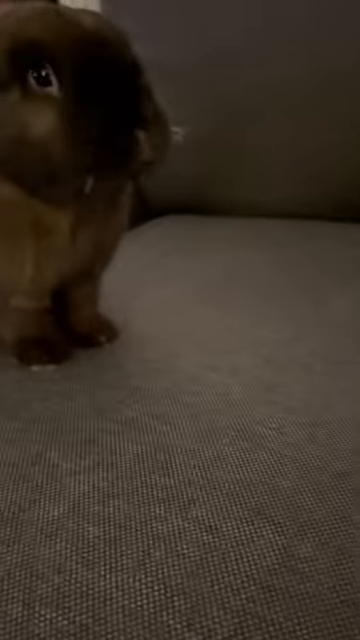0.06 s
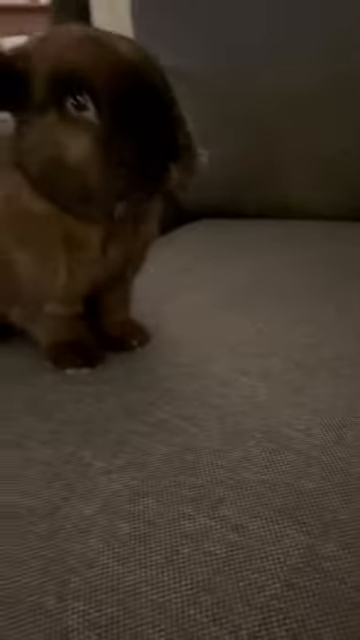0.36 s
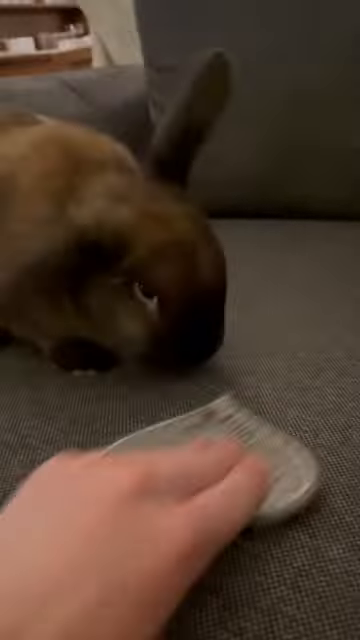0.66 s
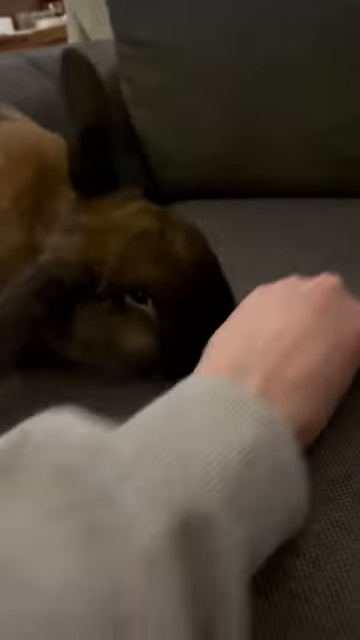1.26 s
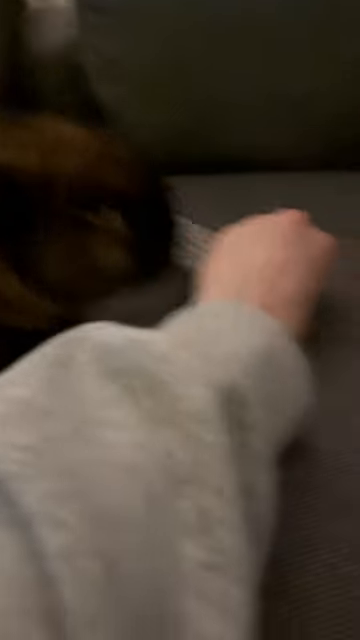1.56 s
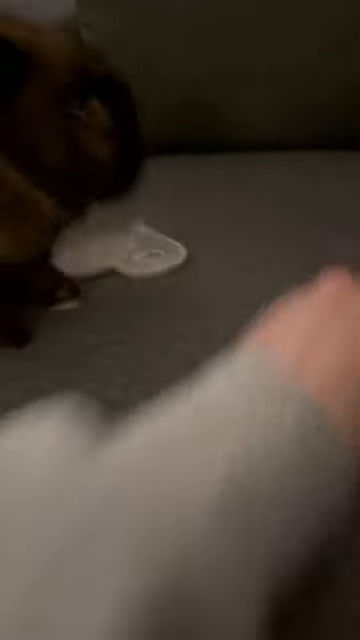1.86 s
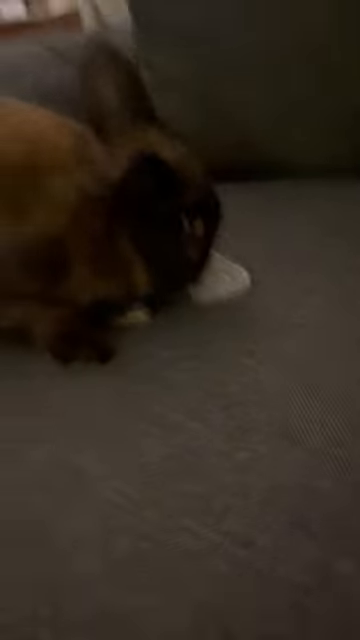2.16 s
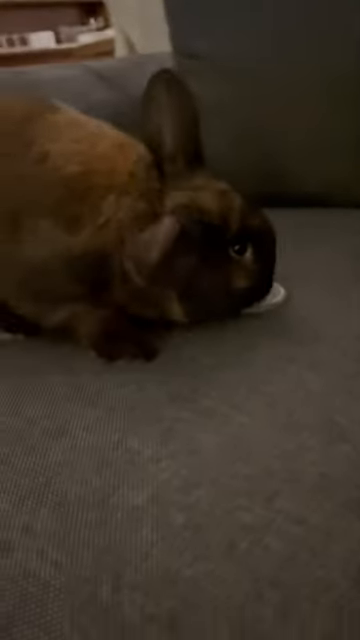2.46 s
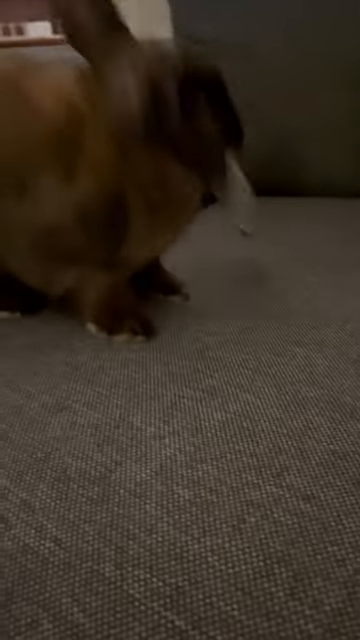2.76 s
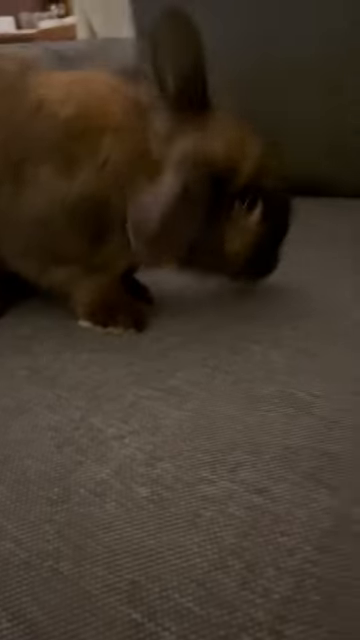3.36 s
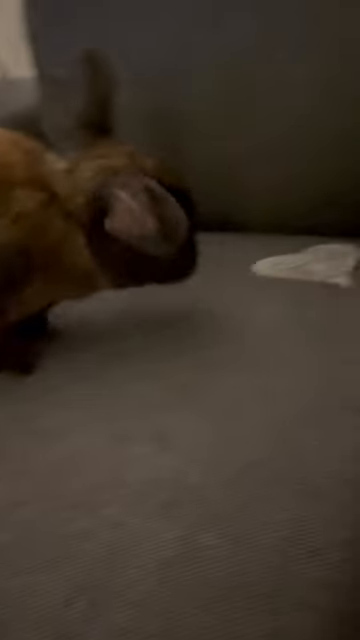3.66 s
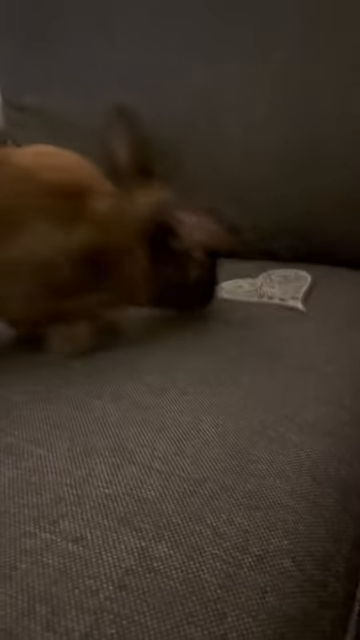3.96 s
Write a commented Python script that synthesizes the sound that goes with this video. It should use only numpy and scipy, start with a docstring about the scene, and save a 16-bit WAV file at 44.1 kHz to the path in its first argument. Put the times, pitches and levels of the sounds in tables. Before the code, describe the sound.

A cloth piece slides over couch fabric, followed by soft thumps and ticks from a rabbit.

```python
"""In a quiet humming room, heard from close by, a hand slaps a flat cloth piece onto a couch (0.5 s) and
slides it towards a rabbit; stick-slip friction over the weave makes it buzz, scrape and hiss.
The cuff rustles by the microphone (from 1.3 s), then the sleeve drags back over the seat (1.6-2.4 s) as
paws thump the cushion (1.8 s). The rabbit picks the piece up with ticks of teeth and claws, tosses it
and drops on its paws (from 3 s), each impact exciting the cover, frame and cushion of the seat."""
import sys
import numpy as np
from scipy import signal
from scipy.fft import rfft, irfft
from scipy.io import wavfile
from scipy.ndimage import uniform_filter1d

SR = 44100
rng = np.random.default_rng(int(sys.argv[2]) if len(sys.argv) > 2 else 0)


def generate_wav(signal):
    """Clip the signal to [-1, 1] and save it as 16-bit WAV at the path in sys.argv[1]."""
    frames = np.transpose(np.atleast_2d(signal))
    scaled = np.clip(frames, -1, 1) * 32767
    pcm = np.round(scaled).astype(np.int16)
    wavfile.write(sys.argv[1], SR, pcm)


N = 176400
T = np.arange(N) / SR
HZ = np.fft.rfftfreq(N, 1 / SR)

# Rubbing sounds at the two microphone ports: frequency_hz, correlation, left_minus_right_db
MIC_PORTS = [(49.7, 0.94, -0.5), (129, 0.85, 0.5), (254, 0.94, 0.5), (615, 0, 2), (1070, 0.095, 2.5),
             (2020, 0.61, 0.5), (3300, 0.27, -0.5), (6100, 0, 1.5), (7140, 1, -5), (9050, 0.68, 1.5),
             (11500, 1, 0)]
# The piece as a compact source a little to the left: frequency_hz, correlation, extra_left_minus_right_db
PIECE_POSITION = [(100, 1, -0.5), (290, 1, 0.5), (640, 0.57, 4), (1300, 0.93, 3), (2400, 0.42, -1.5),
                  (5000, .2, 0.5)]
# Two grades of friction: coarse snags on threads and fine slips of fibres
SNAGS = dict(slips_per_s=2600, spread_db=2.5)
FIBRES = dict(slips_per_s=14000, spread_db=3)


def amp(db):
    """Amplitude ratio of a level in decibels."""
    return 10 ** (np.asarray(db) / 20)


def unit(x):
    """Normalisation to an rms of 1."""
    return x / np.sqrt(np.mean(x ** 2) + 1e-20)


def spectrum(points, column=1):
    """Interpolation of one table column over logarithmic frequency."""
    table = np.array(points, float)
    return np.interp(np.log(HZ + 1), np.log(table[:, 0] + 1), table[:, column])


def envelope(points):
    """Gain interpolated in time from a table's last column (dB); silent outside the table."""
    table = np.array(points)
    sounding = (T > table[0, 0]) & (T < table[-1, 0])
    return amp(np.interp(T, table[:, 0], table[:, -1])) * sounding


def swell(peak_s, rise_s, fall_s, level_db):
    """Peaked envelope, 14 dB down one rise time before the peak and one fall time after."""
    distance = np.where(T < peak_s, (peak_s - T) / rise_s, (T - peak_s) / fall_s)
    return amp(level_db - 14 * np.minimum(distance, 10) ** 1.4)


def colour(x, points):
    """Minimum-phase filtering: folding the cepstrum makes a table of gains a causal response."""
    cepstrum = irfft(np.log(amp(spectrum(points))), N)
    cepstrum[1:N // 2] *= 2
    cepstrum[N // 2 + 1:] = 0
    return irfft(rfft(x) * np.exp(rfft(cepstrum)), N)


def wander(rate_hz):
    """Random modulation: low-passed noise of rms 1."""
    return unit(irfft(rfft(rng.standard_normal(N)) * np.exp(-(HZ / rate_hz) ** 2), N))


def correlate(pair, points):
    """Partial coherence: mid-side mixing makes independent signals alike or opposed at the two ports."""
    first, second = rfft(pair)
    correlation = np.clip(spectrum(points), -1, 1)
    mid = first * np.sqrt((1 + correlation) / 2)
    side = second * np.sqrt((1 - correlation) / 2)
    return irfft(np.array([mid + side, mid - side]), N)


def add(mix, start_s, sound):
    """Superposition of a sound onto the mix."""
    part = mix[round(start_s * SR):][:len(sound)]
    part += sound[:len(part)]


def shifting_folds(pair, depth_db=2.5):
    """Spectral modulation: the colour drifts in random patches as new folds of cloth take the load."""
    spectrogram = signal.stft(pair, nperseg=512)[2]
    patches = rng.standard_normal(spectrogram.shape[1:])
    patches = uniform_filter1d(patches, size=4, axis=0)
    patches = uniform_filter1d(patches, size=9, axis=1)
    return signal.istft(spectrogram * amp(depth_db * unit(patches)), nperseg=512)[1][:, :N]


def friction(colour_points, slips_per_s, spread_db, coherence=MIC_PORTS):
    """Stick-slip friction: a dense random train of tiny impulses of uneven size merges into noise."""
    size = amp(spread_db * np.minimum(rng.exponential(1, (2, N)), 4))
    direction = rng.choice([-1, 1], (2, N))
    slipping = rng.random((2, N)) < slips_per_s / SR
    slips = correlate(size * direction * slipping, coherence)
    return unit(colour(shifting_folds(slips), colour_points))


def room():
    """Ambient noise: a low, partly coherent floor under hum tones that waver in phase and amplitude."""
    # Spectrum of the room noise: frequency_hz, gain_db
    air_colour = [(20, -20), (40, -5), (90, 4.5), (130, -7.5), (190, -11.5), (240, -6.5), (310, -10),
                  (450, -19.5), (620, -20.5), (1050, -31), (1450, -25), (1950, -28.5), (2400, -39.5),
                  (3200, -44), (5400, -45.5), (8000, -53.5), (12000, -52), (15500, -70.5)]
    # Its coherence between the ports: frequency_hz, correlation
    air_coherence = [(60, 1), (130, 0.94), (290, .63), (640, -0.54), (1400, 0.014), (3100, -0.038),
                     (12000, 0.96)]
    # Tones of the hum: pitch_hz, level_db
    hum_tones = [(180, -68), (198, -69), (300.5, -69.5), (399, -75.5)]
    air = correlate(rng.standard_normal((2, N)), air_coherence)
    air = amp(-60) * unit(colour(air, air_colour))
    hum = np.zeros(N)
    for pitch_hz, level_db in hum_tones:
        tone = np.sin(2 * np.pi * pitch_hz * T + 0.89 * wander(rate_hz=9.3))
        hum += amp(level_db) * unit(tone * (1 + 0.37 * wander(rate_hz=4.5)))
    return air + hum


def reverberation(direct, level_db=-28, t60_s=0.11):
    """Diffuse reflections: absorption in a furnished room leaves a faint, short exponential tail."""
    t = T[:SR // 2]
    tail = rng.standard_normal((2, len(t))) * amp(-60 * t / t60_s) * (t > 0.005)
    tail /= np.linalg.norm(tail[0])
    return amp(level_db) * signal.fftconvolve(direct, tail, axes=1)[:, :N]


def forearm():
    """Coarse friction: the forearm leans and rubs on the cushion with a dull rumble."""
    # Strength of the rubbing: time_s, level_db
    rub_levels = [(.66, -73), (.78, -60), (1.1, -60), (1.3, -52.5), (1.45, -63.5), (1.7, -60), (1.9, -54.5),
                  (2.25, -79), (2.4, -91)]
    # Spectrum of the rumble: frequency_hz, gain_db
    rub_colour = [(30, -35), (70, 2), (110, 5.5), (160, 0.5), (260, 0.5), (420, -9.5), (700, -24.5),
                  (2000, -47.5)]
    return friction(rub_colour, **SNAGS) * envelope(rub_levels)


def cuff():
    """Near-field friction: cloth rustles so close that its midrange drives the ports in antiphase."""
    # Strength of the rustle: time_s, level_db
    rustle_levels = [(1.3, -66), (1.45, -61.5), (1.57, -62), (1.65, -68), (1.75, -75)]
    # Spectrum of the rustle: frequency_hz, gain_db
    rustle_colour = [(150, 0), (350, 5.5), (600, -3), (1000, -11), (1250, -7), (1450, -6), (1800, -16),
                     (3000, -21), (9000, -23.5), (15000, -32)]
    # Coherence between the ports: frequency_hz, correlation (clipped to -1..1 in use)
    rustle_coherence = [(150, 0.3), (350, -0.94), (650, -1.16), (1500, -0.9), (5000, 1)]
    return friction(rustle_colour, **FIBRES, coherence=rustle_coherence) * envelope(rustle_levels)


def sleeve():
    """Sliding friction: fine fibres slip almost evenly as the sleeve drags back over the seat."""
    # Strength of the drag: time_s, level_db
    drag_levels = [(1.62, -76), (1.71, -66.5), (1.76, -59.5), (1.82, -55), (1.88, -58.5), (2.0, -58.5),
                   (2.12, -60), (2.2, -60), (2.26, -62), (2.32, -59.5), (2.38, -68.5), (2.43, -86)]
    # Spectrum of the drag: frequency_hz, gain_db
    drag_colour = [(60, 15.5), (250, 3.5), (450, 7.5), (800, 4), (1400, -0.5), (2300, -0.5), (3300, -3.5),
                   (5500, -3), (7500, -13), (9500, -9.5), (11500, -15), (13200, -21), (15500, -23)]
    return friction(drag_colour, **FIBRES) * envelope(drag_levels) * amp(0.27 * wander(rate_hz=29))


def soft_swells():
    """Amplitude envelopes shape fine noise into short swells, each with its own spectral tilt."""
    # Brushing of fibres, except the last row, a soft, dull wash of noise just after the 3.33 s thump:
    # peak_s, rise_s, fall_s, level_db, tilt_db_per_octave (above 1 kHz)
    swells = [(.05, 0.12, 0.086, -68, -2), (.10, 0.061, 0.058, -59.5, 4), (.26, 0.027, .04, -71.5, 3),
              (.36, 0.065, 0.16, -79.5, -1), (1.085, .015, .02, -66, -7.5),
              (1.308, 0.014, .03, -62.5, -6.5), (1.55, .12, 0.089, -70, 1),
              (1.648, 0.0043, 0.021, -68, -4.5), (2.427, .006, 0.017, -78, -3),
              (2.504, 0.016, 0.023, -70, -6.5), (2.535, 0.01, 0.047, -70.5, -4), (2.58, .05, 0.09, -89, 4),
              (2.695, 0.048, 0.053, -77.5, 1), (2.709, 0.0058, 0.0057, -71, 6),
              (2.922, 0.011, 0.0093, -63, -2), (2.945, 0.055, 0.059, -70, -7.5),
              (3.062, .004, 0.027, -63.5, -6.5), (3.142, 0.0079, 0.016, -70.5, -1.5),
              (3.182, 0.01, 0.014, -64, 2.5), (3.343, 0.013, 0.046, -68.5, -7)]
    # Spectrum of the noise before the tilt: frequency_hz, gain_db
    noise_colour = [(300, -10.5), (1500, -5.5), (2500, -2.5), (3200, -7), (4400, -4.5), (5450, 4),
                    (6200, -0.5), (8000, -5), (9500, 1), (11300, -3), (13000, -9.5), (14800, -5),
                    (15800, -12)]
    noise = rfft(friction(noise_colour, **FIBRES))
    octaves = np.log2(np.maximum(HZ, 1000) / 1000)
    out = np.zeros((2, N))
    for peak_s, rise_s, fall_s, level_db, tilt in swells:
        tilted = unit(irfft(noise * amp(tilt * octaves), N))
        out += tilted * swell(peak_s, rise_s, fall_s, level_db)
    return out


def scuffs():
    """Transient friction: paws and fingers snag on a few threads in short, dull rubs."""
    # Rubs on the weave: peak_s, rise_s, fall_s, level_db
    rubs = [(1.264, .003, 0.0098, -60), (1.315, 0.01, .025, -61.5), (1.836, 0.0088, 0.018, -54.5),
            (2.204, 0.026, 0.014, -62.5), (3.142, 0.0078, 0.012, -56), (3.176, 0.007, 0.022, -57),
            (3.312, .004, 0.018, -59), (3.429, 0.018, 0.016, -68)]
    # Spectrum of the rubs: frequency_hz, gain_db
    rub_colour = [(100, -16.5), (300, 2.5), (500, 6.5), (850, -0.5), (1300, -10), (2200, -22), (4000, -29),
                  (12000, -34)]
    return friction(rub_colour, **SNAGS) * sum(swell(*rub) for rub in rubs)


def squeaks():
    """Resonance: rubbing noise briefly excites narrow modes of fibres and gripped edges."""
    # Excited modes: peak_s, rise_s, fall_s, pitch_hz, width_hz, level_db
    modes = [(0.531, 0.021, 0.12, 11500, 1000, -62), (0.83, 0.25, 0.17, 16000, 490, -79),
             (1.3, .015, 0.022, 2380, 170, -71), (1.1, .01, 0.051, 2774, 590, -70.5),
             (1.6, .01, 0.037, 4460, 610, -74), (2.537, 0.04, 0.045, 2520, 90, -73),
             (2.923, 0.0064, .008, 5450, 260, -63), (2.921, 0.0051, 0.0073, 9600, 480, -66),
             (2.925, .008, .015, 3430, 240, -69.5)]
    rub = rfft(rng.standard_normal(N))
    out = np.zeros(N)
    for peak_s, rise_s, fall_s, pitch_hz, width_hz, level_db in modes:
        resonance = 1 / (1 + 2j * (HZ - pitch_hz) / width_hz) ** 2
        out += unit(irfft(rub * resonance, N)) * swell(peak_s, rise_s, fall_s, level_db)
    return out


def ticks(crumble_decay_s=0.0016, ring_peak_s=0.00045, upper_mode_ratio=1.396):
    """Hard impact: claws and teeth give a snap, a crumble and a thin ring, all within milliseconds."""
    # Contacts: start_s, snap_db (before filtering), ring_hz, ring_db
    contacts = [(1.8323, -40, 6030, -46), (2.7088, -48, 6740, -58), (2.9303, -41, 6570, -45),
                (2.9312, -39.5, 2380, -55), (3.0591, -47.5, 2230, -57), (3.1412, -65, 6000, -64),
                (3.1692, -52, 2400, -67), (3.3298, -36, 4790, -49), (3.3308, -37, 5770, -55)]
    # Filter on the snap and crumble: frequency_hz, gain_db
    snap_colour = [(200, -9), (700, 8), (1300, 11), (2100, 9), (2600, 9.5), (3600, -6), (5500, -3),
                   (8000, 5.5), (11000, -3), (15000, -10)]
    t, snaps, rings = T[:SR // 50], np.zeros(N), np.zeros(N)
    ring_envelope = t / ring_peak_s * np.exp(1 - t / ring_peak_s)
    for start_s, snap_db, ring_hz, ring_db in contacts:
        crumble = amp(-18) * np.exp(-t / crumble_decay_s) * rng.standard_normal(len(t))
        add(snaps, start_s, amp(snap_db) * (signal.unit_impulse(len(t)) + crumble))
        phase = 2 * np.pi * ring_hz * t
        ring = np.sin(phase) + amp(-7) * np.sin(upper_mode_ratio * phase)
        add(rings, start_s, amp(ring_db) * ring * ring_envelope)
    return colour(snaps, snap_colour) + rings


def cover_twang(t, top_hz=1498, sag_s=0.0001168, rise_s=0.0043, decay_s=0.037):
    """Membrane vibration: the struck, taut cover twangs in a damped falling chirp."""
    pitch_hz = top_hz / np.sqrt(1 + t / sag_s)
    chirp = -np.sin(2 * np.pi * np.cumsum(pitch_hz) / SR)
    return chirp * np.sqrt(t / (t + rise_s)) * np.exp(-t / decay_s)


def frame_ring(t):
    """Modal vibration: the struck seat frame rings as a sum of damped sinusoids."""
    # Modes of the frame: pitch_hz, level_db (relative to the cover), t60_s
    modes = [(85.54, -11.5, 0.72), (116.5, -14, 0.35), (150, -13.5, 0.29), (188.4, -10, 0.1),
             (240, -15, .05), (305, -40, 0.11), (396, -43, 0.14)]
    return sum(amp(level_db - 60 * t / t60_s) * np.sin(2 * np.pi * hz * t) * (1 - np.exp(-t * hz))
               for hz, level_db, t60_s in modes)


def seat_thumps(give_s=0.0096, settle_s=0.25, shudder_db=-5, shudder_t60_s=0.32):
    """Soft impact: a blow excites cover and frame, bounces the springy cushion and shakes its stuffing."""
    # Blows of the landing piece, then of paws:
    # start_s, cover_db, cutoff_hz (higher is harder), cushion_db, cushion_hz, cushion_t60_s
    blows = [(0.496, -51, 500, -42.5, 60.5, 0.26), (1.751, -39.5, 200, -34.5, 62, 0.13),
             (1.8328, -29.5, 750, -32.5, 53.2, 0.78), (1.888, -43, 140, -50, 60, .2),
             (3.0593, -35.5, 1490, -39, 60.6, 0.24), (3.0711, -49, 150, -24, 61.7, 0.28),
             (3.13, -42, 220, -60.5, 71, 0.18), (3.169, -37.5, 266, -42, 60.7, 0.99),
             (3.3294, -26, 1520, -29.5, 63.1, 0.44), (3.424, -48.5, 350, -42, 84.4, 0.46),
             (3.784, -54.5, 248, -46.5, 68.8, 0.37)]
    # How the seat radiates a blow: frequency_hz, gain_db
    radiation = [(25, 4), (60, -1), (115, 0.5), (160, -1), (210, 1), (300, -4), (450, -0.5), (750, 0.5),
                 (1100, 0), (2000, 1.5)]
    # Spectrum of the shuddering stuffing: frequency_hz, gain_db
    stuffing_colour = [(20, -19), (45, -3.5), (85, 1), (125, 1), (170, -12.5), (240, -17.5), (500, -33.5),
                       (2000, -74)]
    t, thumps, shudder = T[:SR], np.zeros(N), np.zeros(N)
    cover_and_frame = cover_twang(t) + frame_ring(t)
    give = 1 - np.exp(-(t / give_s) ** 2)
    settling = np.exp(-(t / settle_s) ** 4)  # the weight settles and cuts the ringing short
    for start_s, cover_db, cutoff_hz, cushion_db, cushion_hz, t60_s in blows:
        knock = amp(cover_db) * signal.lfilter(*signal.butter(2, cutoff_hz, fs=SR), cover_and_frame)
        bounce_envelope = give * amp(cushion_db - 60 * (t - give_s) / t60_s)
        bounce = np.sin(2 * np.pi * cushion_hz * t) * bounce_envelope
        add(thumps, start_s, (knock + bounce) * settling)
        add(shudder, start_s, give * amp(cover_db + shudder_db - 60 * t / shudder_t60_s))
    stuffing = unit(colour(rng.standard_normal(N), stuffing_colour))
    return colour(thumps, radiation) + shudder * stuffing


def piece_slap():
    """Impulse response: the piece lands edge after edge, each pulse exciting the same short slap."""
    # Edges landing: start_s, level_db (before filtering), cutoff_hz (higher is harder)
    edges = [(0.4949, -32, 4970), (.4987, -27.5, 3000), (.5026, -27, 6000), (0.506, -24, 2000),
             (0.5103, -27.5, 1500)]
    # Spectrum of the slap: frequency_hz, relative_gain_db
    slap_colour = [(30, -29), (65, -8), (150, -16), (280, 11.5), (520, 8.5), (840, 8.5), (1100, 5),
                   (1500, 0.5), (1950, 5.5), (2700, -19), (5600, -15), (11000, -5.5), (15000, -67)]
    pulses = np.zeros(N)
    for start_s, level_db, cutoff_hz in edges:
        impulse = amp(level_db) * signal.unit_impulse(SR // 100)
        add(pulses, start_s, signal.lfilter(*signal.butter(1, cutoff_hz, fs=SR), impulse))
    response = colour(signal.unit_impulse(N), slap_colour)
    return signal.fftconvolve(pulses, response / abs(response).max())[:N]


def piece_slide(speed_jitter=0.04, overtone_db_per_octave=-11, rasp_db=3):
    """Periodic friction: the piece buzzes at the rate it crosses threads, over a scrape and a hiss."""
    # Motion over the weave: time_s, threads_per_s, buzz_db
    motion = [(0.511, 622, -54), (.545, 490, -51.5), (.57, 387, -43), (.6, 333, -58), (0.629, 260, -51),
              (0.669, 280, -61), (.70, 228, -62), (.81, 131, -52.5), (.87, 126, -56), (.93, 172, -52),
              (0.971, 175, -54.5), (1.061, 215, -69), (1.23, 177, -53), (1.3, 174, -72),
              (1.389, 135, -51.5), (1.478, 100, -72)]
    # Strength of the scrape on the threads: time_s, level_db
    scrape_levels = [(.489, -48), (.515, -46.5), (.55, -50.5), (.61, -52), (.69, -58), (.76, -56.5),
                     (.87, -64), (.95, -52.5), (1.05, -54), (1.09, -57), (1.22, -56.5), (1.32, -55.5),
                     (1.4, -66.5), (1.5, -105), (1.68, -66)]
    # Spectrum of the scrape: frequency_hz, gain_db
    scrape_colour = [(25, -8), (80, 7), (170, -2), (300, 4.5), (520, -0.5), (900, -8.5), (1300, -13),
                     (2000, -26.5), (3000, -33.5), (8000, -59)]
    # Strength of the hiss of fibres under the piece: time_s, level_db
    hiss_levels = [(.487, -63), (.5, -50.5), (.518, -54.5), (.545, -52.5), (.6, -60), (.68, -65.5),
                   (.8, -69), (1.0, -70.5), (1.27, -69.5), (1.36, -67), (1.48, -69), (1.57, -75),
                   (1.63, -76), (1.72, -75.5), (1.8, -86)]
    # Spectrum of the hiss: frequency_hz, gain_db
    hiss_colour = [(300, -4), (1000, -4), (1900, 9.5), (2800, -0.5), (4300, 1), (5600, 5), (7500, -2),
                   (9000, 3), (11400, 0), (13000, -7), (14800, -1), (15800, -25)]
    time_s, threads_per_s, _ = np.transpose(motion)
    crossing_hz = np.interp(T, time_s, threads_per_s) * (1 + speed_jitter * wander(rate_hz=116))
    phase = 2 * np.pi * np.cumsum(crossing_hz) / SR
    harmonics = sum(amp(overtone_db_per_octave * np.log2(k)) * np.sin(k * phase) for k in range(1, 5))
    buzz = unit(harmonics) * envelope(motion) * (1 + 0.38 * wander(rate_hz=120))
    grip = wander(rate_hz=88)
    rasp = unit(amp(rasp_db * np.cos(phase)))  # the scrape swells at every thread crossed
    snags = friction(scrape_colour, **SNAGS, coherence=PIECE_POSITION)
    scrape = snags * envelope(scrape_levels) * rasp * amp(1.1 * grip)
    hiss = friction(hiss_colour, **FIBRES) * envelope(hiss_levels) * amp(0.35 * grip)
    return buzz + scrape + hiss


def cloth_piece():
    """Localisation: a level difference between the ports sets the slap and slide slightly left."""
    left_gain = amp(spectrum(PIECE_POSITION, column=2) / 2)
    return irfft(rfft(piece_slap() + piece_slide()) * np.array([left_gain, 1 / left_gain]), N)


def scene():
    """Superposition of the direct sound from the couch, its reverberation and the room noise."""
    direct = cloth_piece() + forearm() + cuff() + sleeve()
    direct += soft_swells() + scuffs() + squeaks() + ticks() + seat_thumps()
    return direct + reverberation(direct) + room()


def record(dry, band_limit_hz=15800):
    """Two-port pickup: level and phase differences between the channels, then a low-pass band limit."""
    # Phase by which the left port leads: frequency_hz, lead_rad
    port_phase = [(200, 0), (600, .45), (1100, .05), (2000, .2), (3200, .7), (5500, 1.3), (7600, 3.14),
                  (9500, 4.75), (11300, 6.3), (12800, 7), (14200, 9.3), (15600, 11.5)]
    left_response = amp(spectrum(MIC_PORTS, column=2) / 2) * np.exp(1j * spectrum(port_phase) / 2)
    pair = irfft(rfft(dry) * np.array([left_response, 1 / left_response]), N)
    low_pass = signal.firwin(511, band_limit_hz, window=("kaiser", 9), fs=SR)
    return signal.oaconvolve(pair, low_pass[None], "same", axes=1)


dry = scene()
out = record(dry)
generate_wav(out)
```